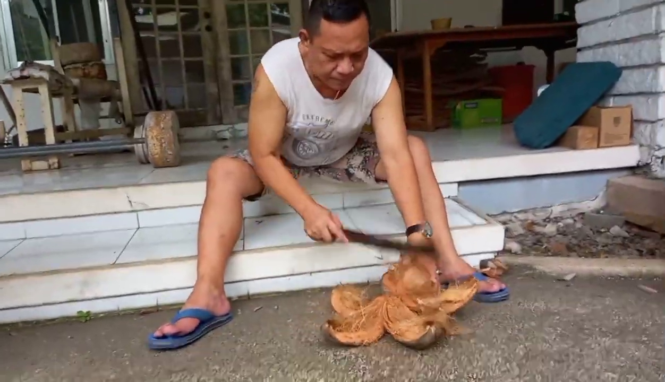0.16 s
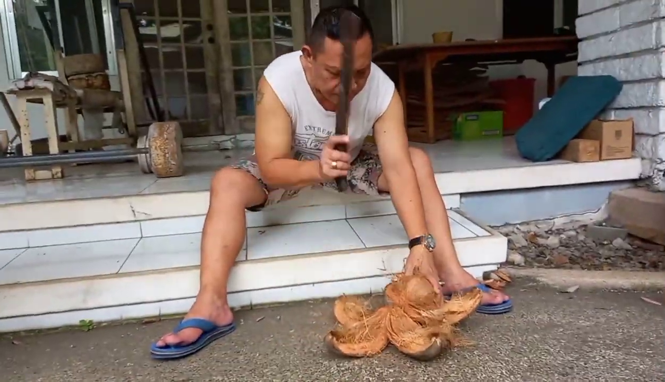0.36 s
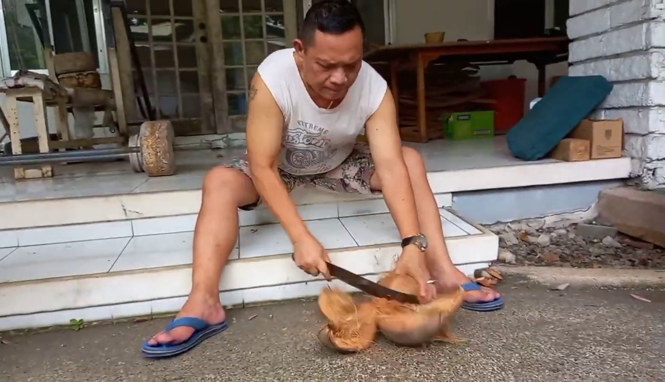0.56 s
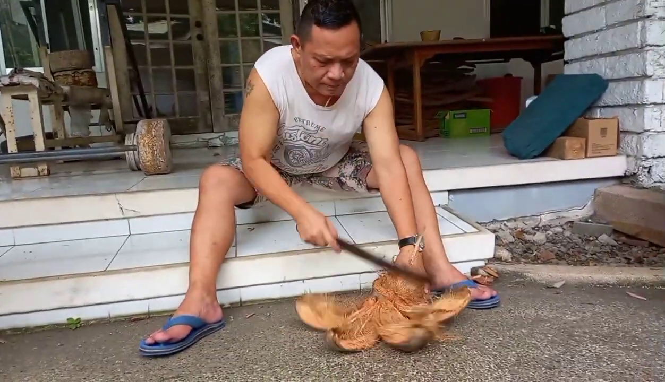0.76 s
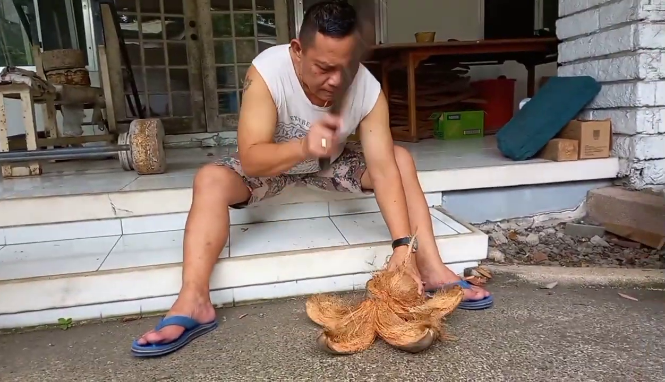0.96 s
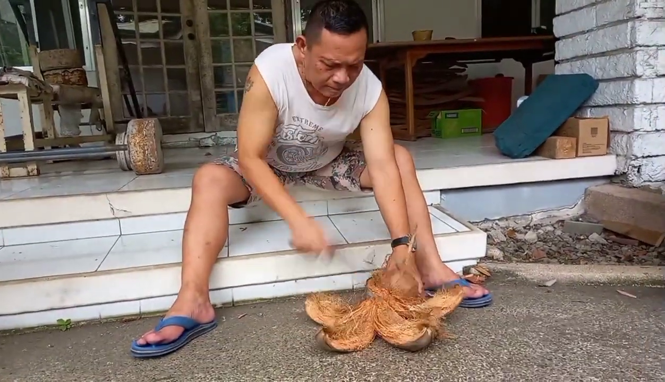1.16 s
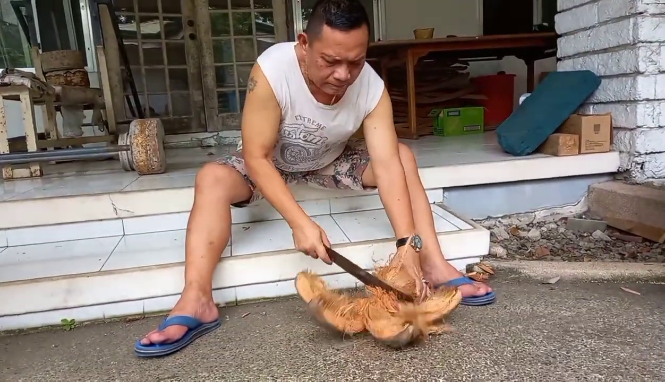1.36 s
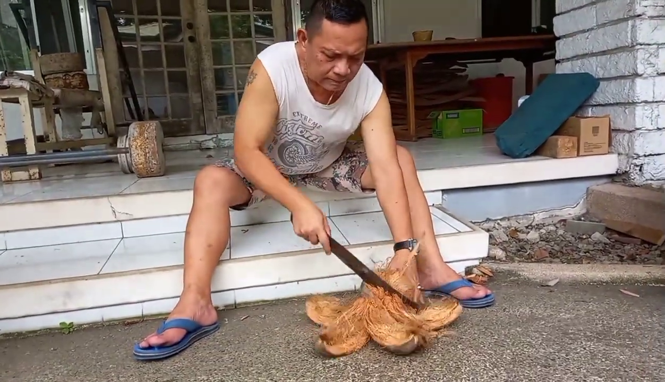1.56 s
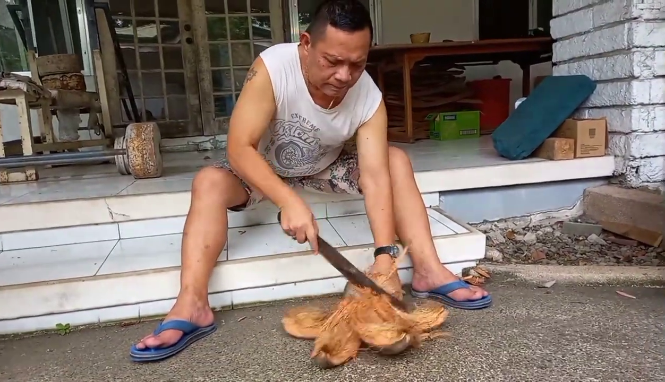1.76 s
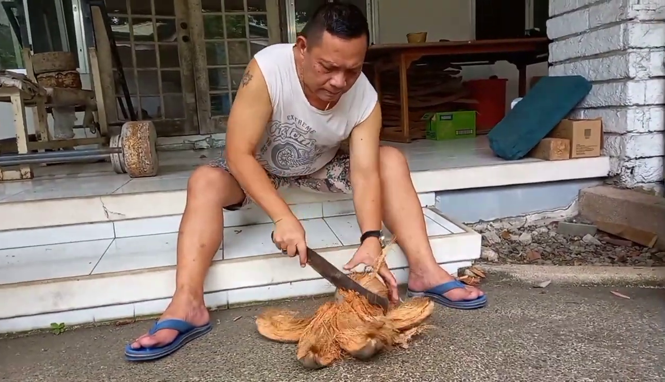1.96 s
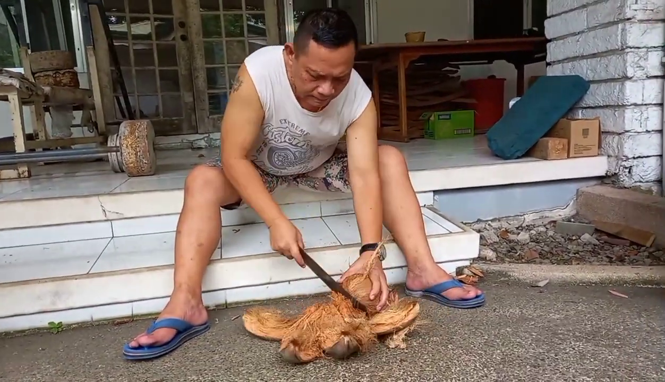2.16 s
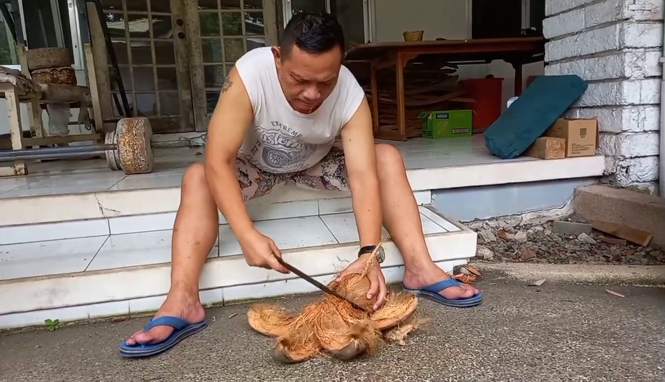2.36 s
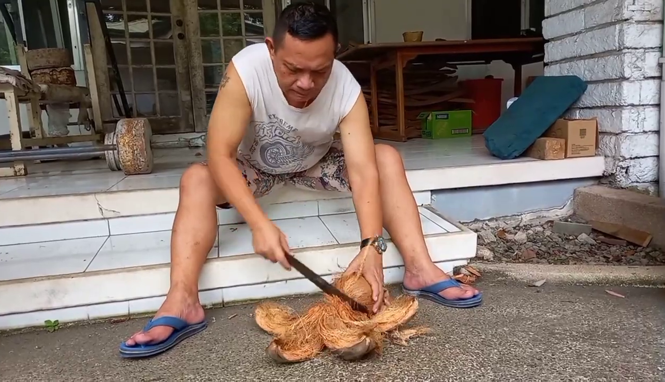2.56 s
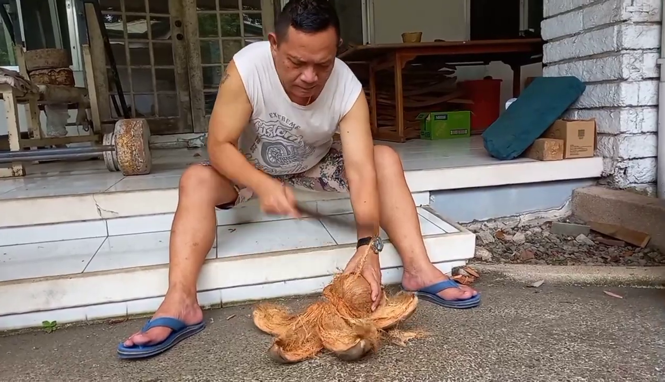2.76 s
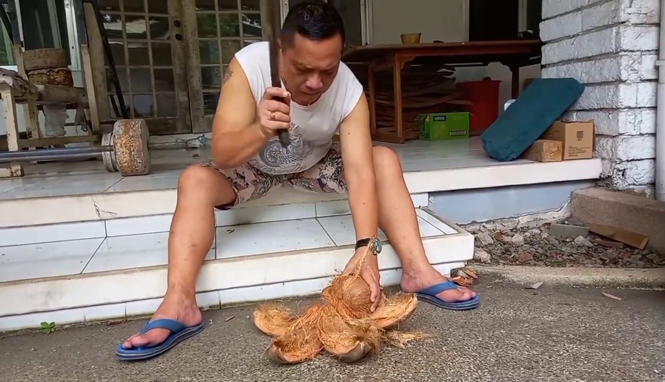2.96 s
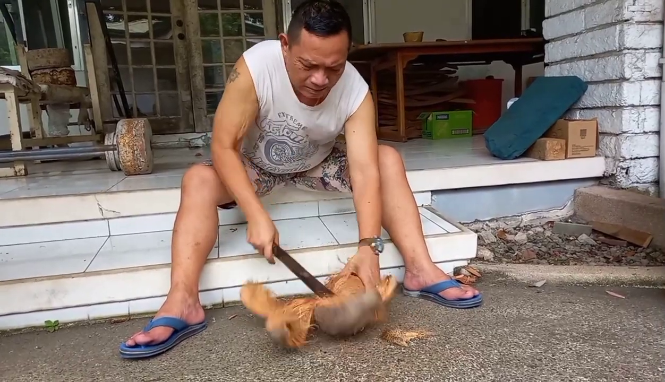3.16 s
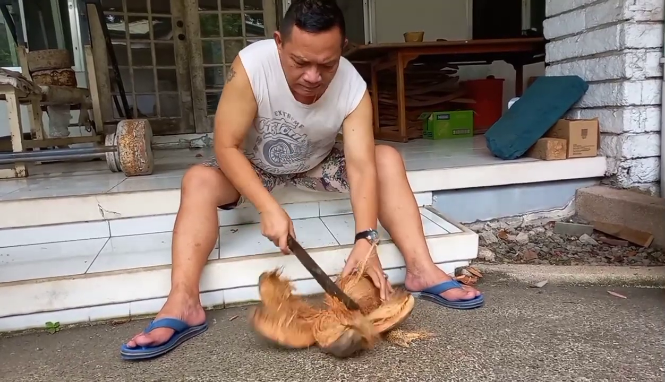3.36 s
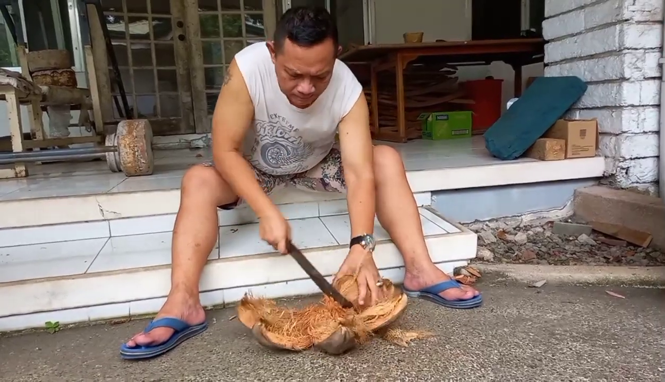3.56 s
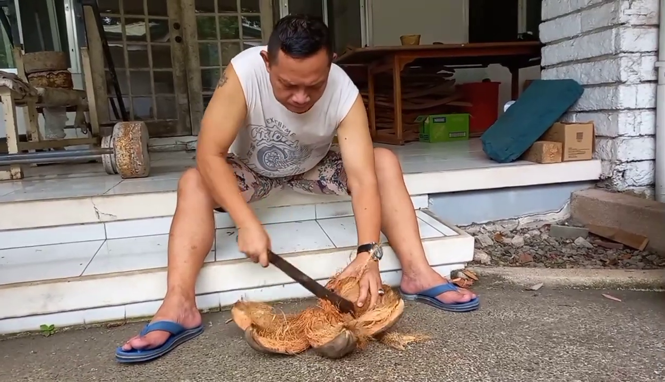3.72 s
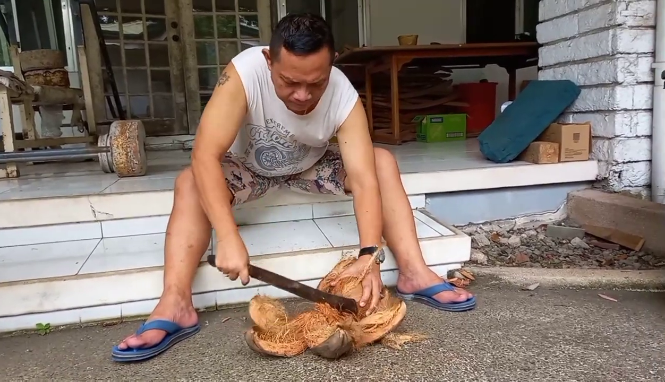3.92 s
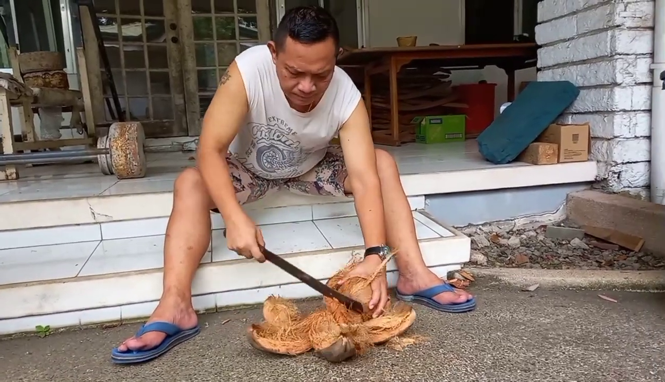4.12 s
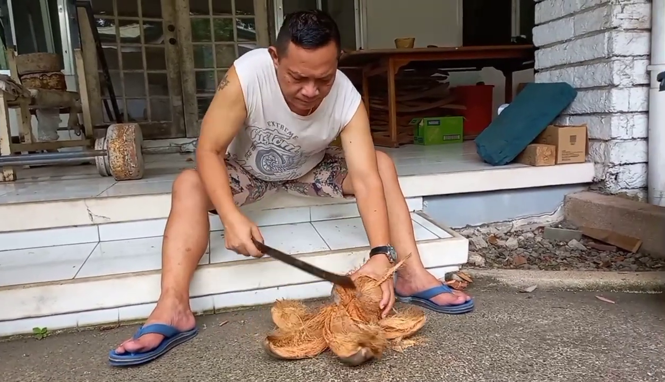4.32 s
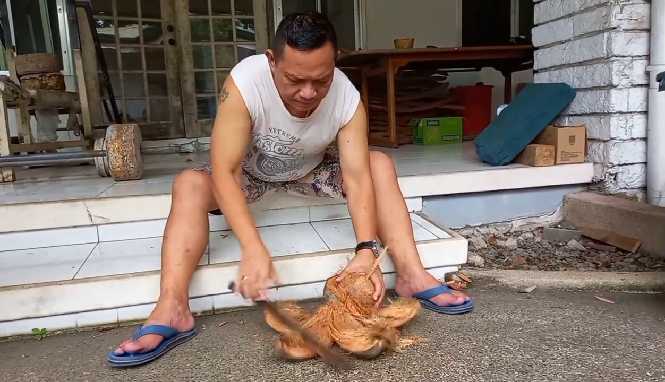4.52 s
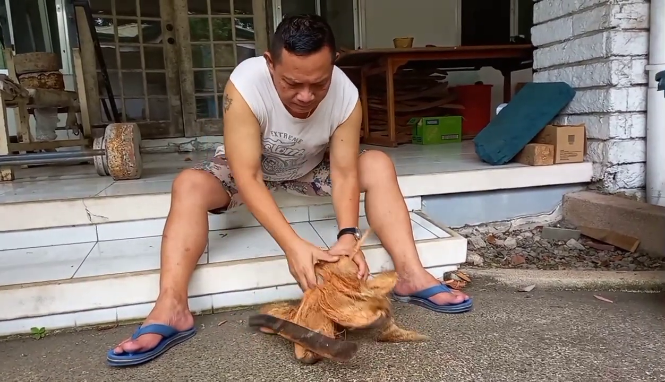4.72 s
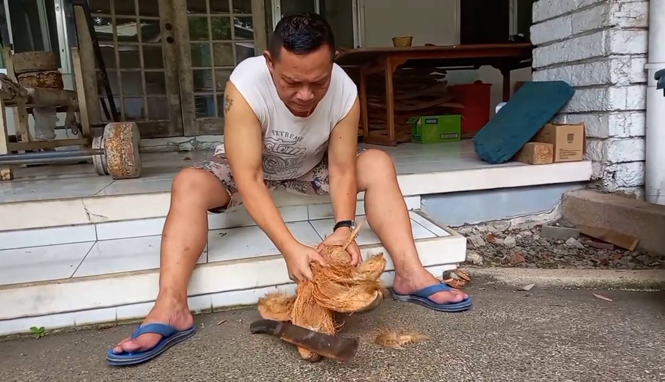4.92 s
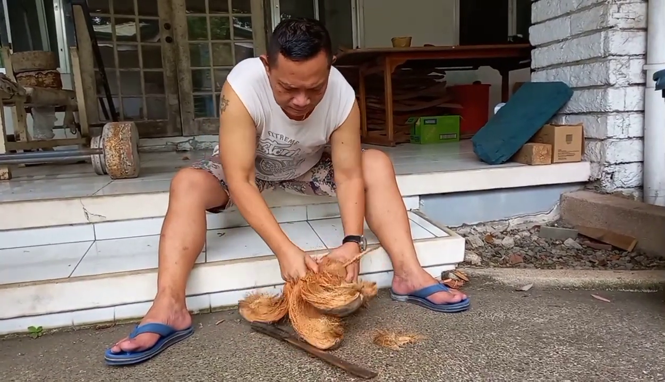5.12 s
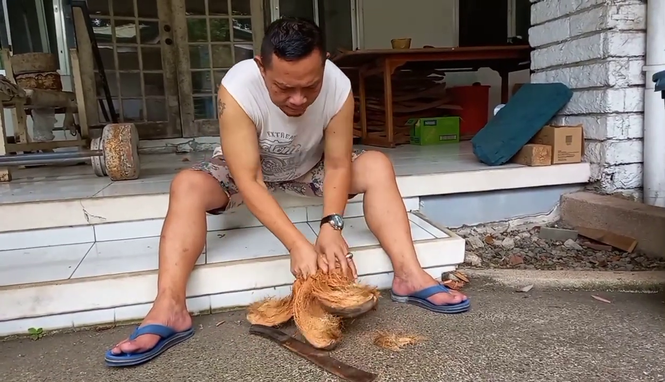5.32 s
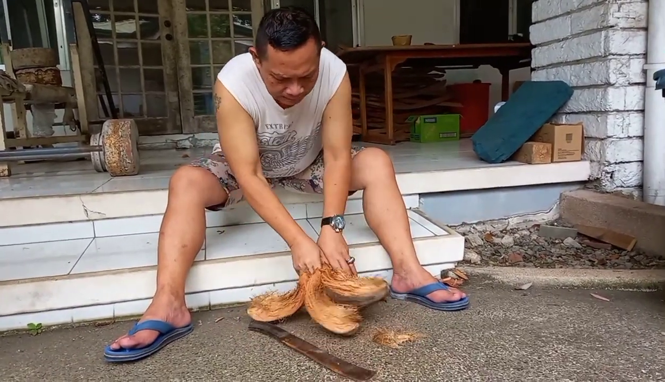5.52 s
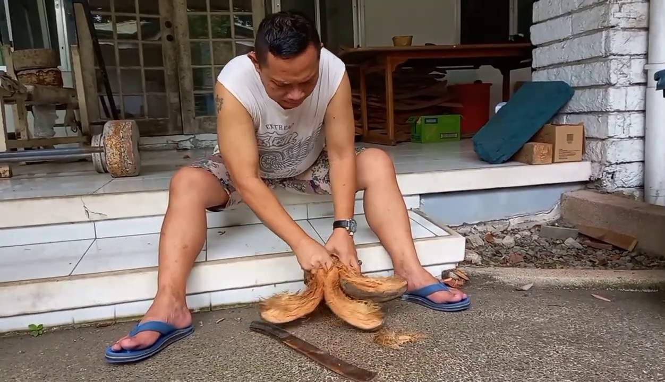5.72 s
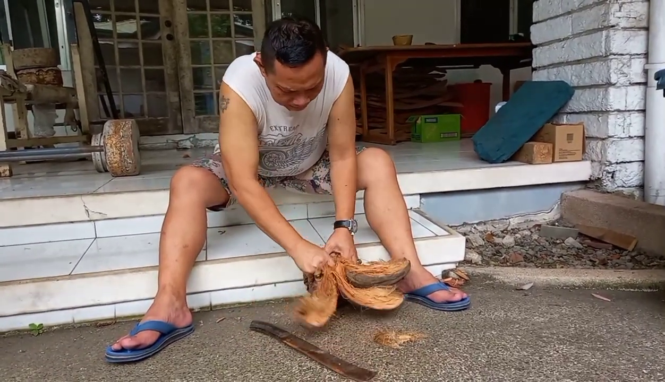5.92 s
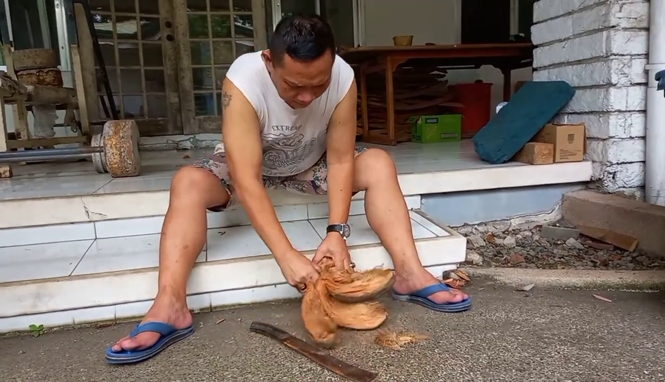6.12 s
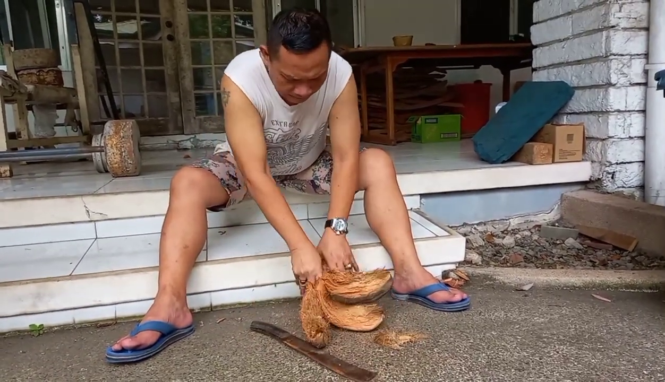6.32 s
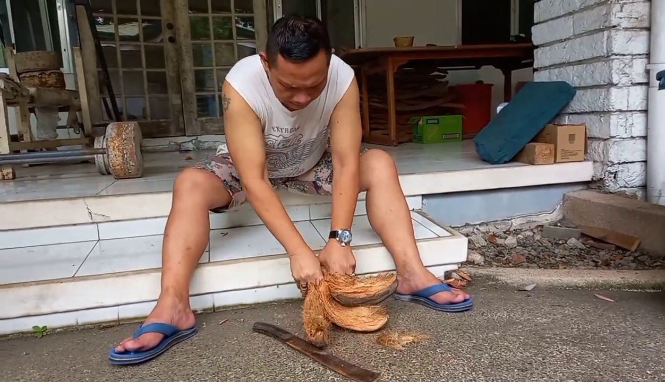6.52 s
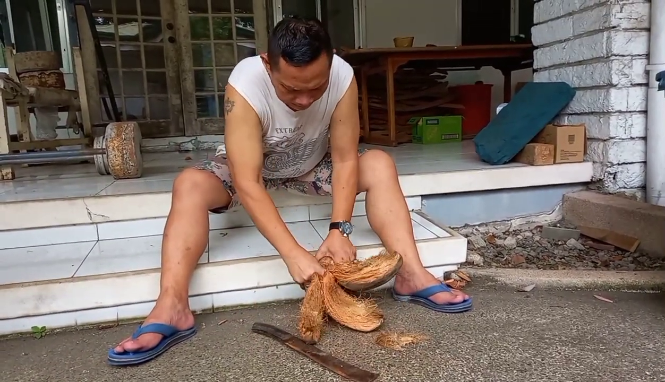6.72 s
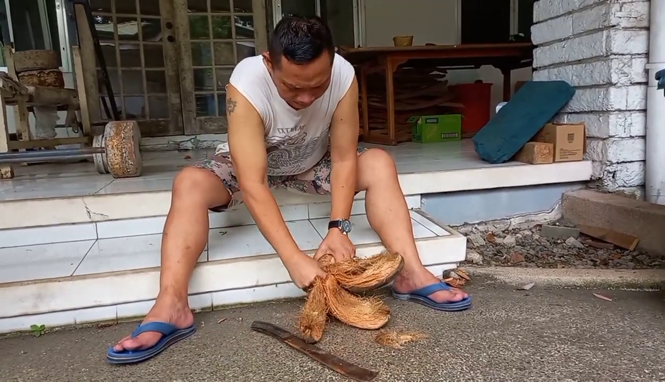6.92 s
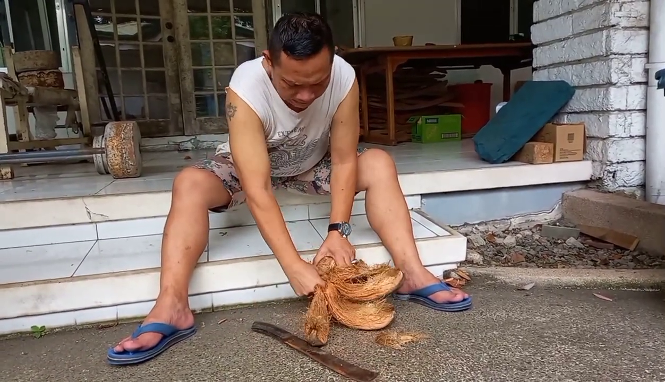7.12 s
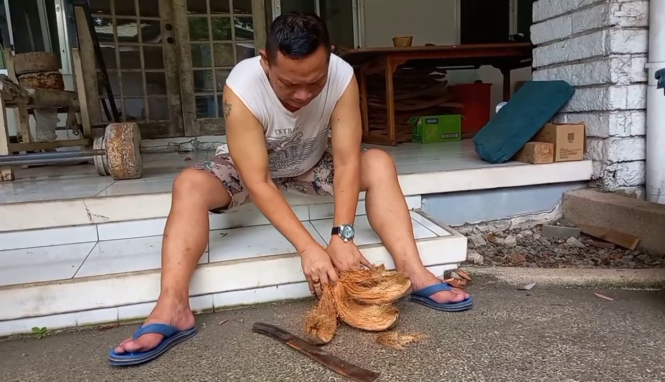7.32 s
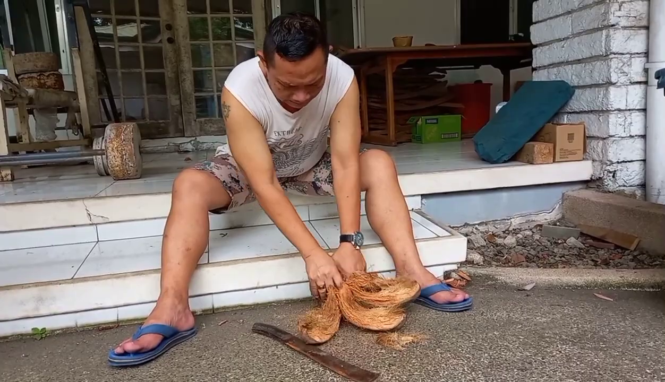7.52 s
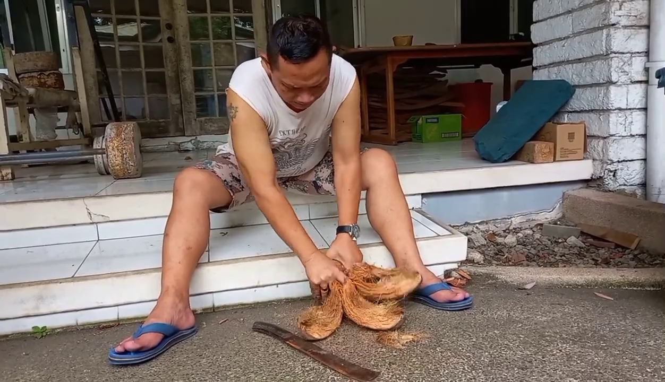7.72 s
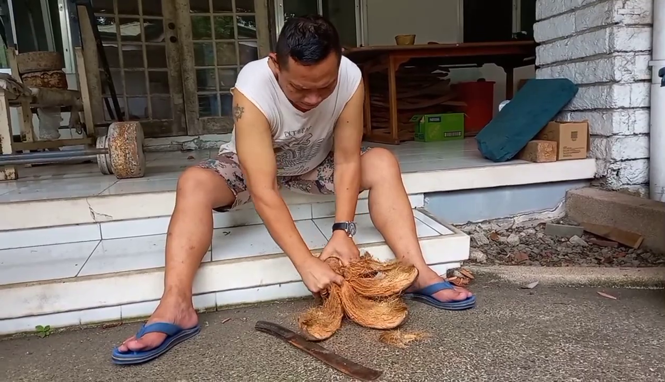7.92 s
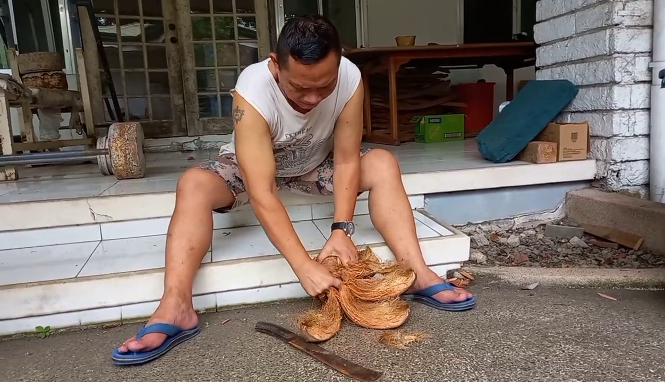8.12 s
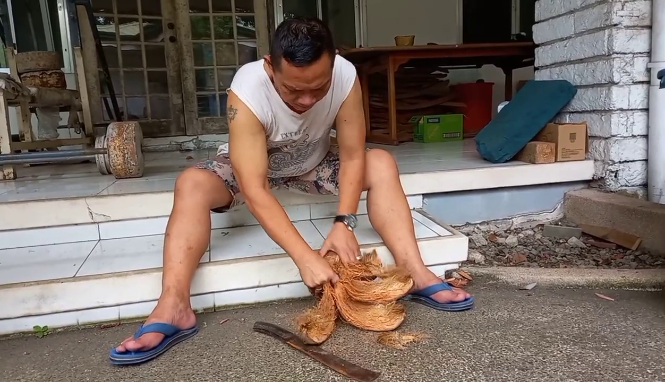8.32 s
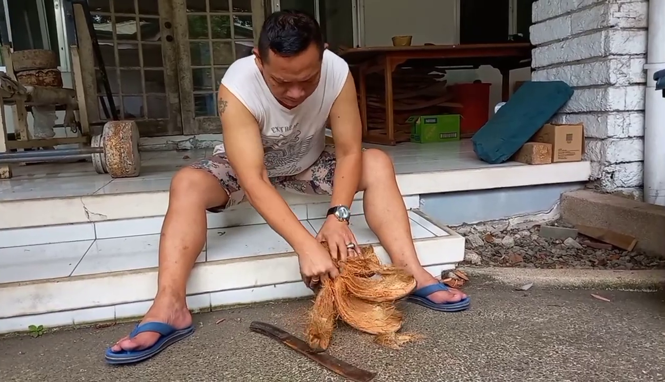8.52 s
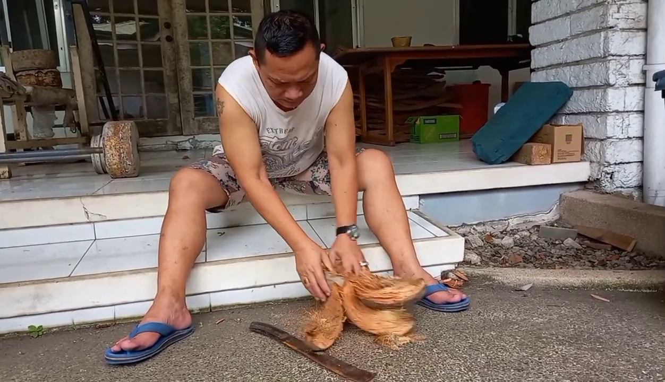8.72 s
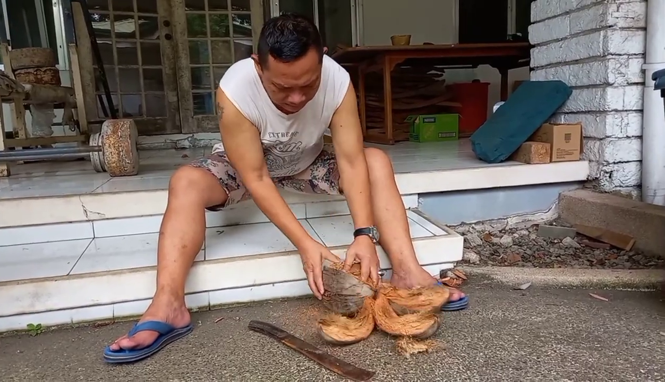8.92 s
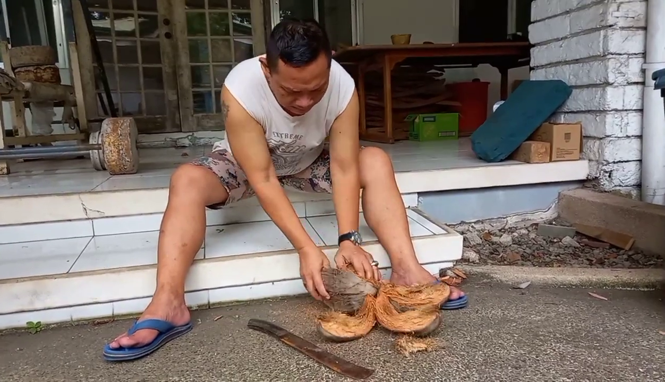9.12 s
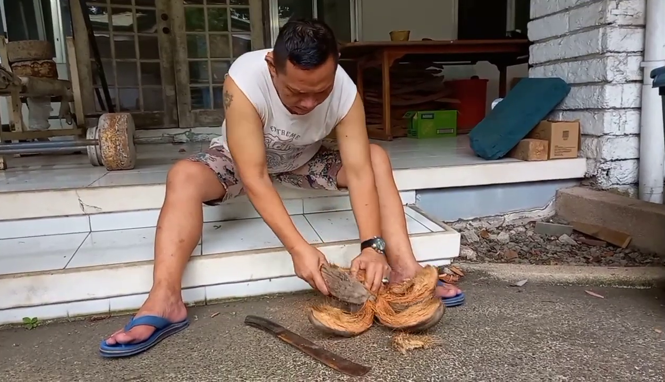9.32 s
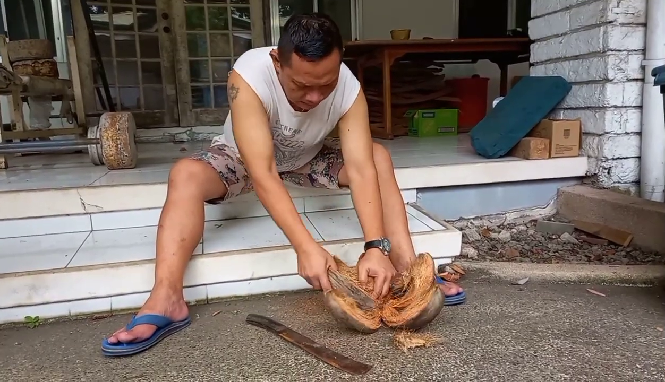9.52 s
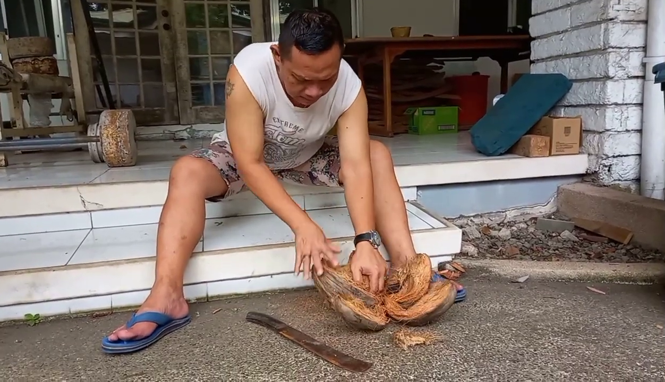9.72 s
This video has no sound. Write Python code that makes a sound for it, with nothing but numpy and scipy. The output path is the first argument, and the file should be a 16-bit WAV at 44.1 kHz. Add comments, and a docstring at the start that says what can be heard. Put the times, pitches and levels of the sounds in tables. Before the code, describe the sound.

Outdoors by a porch, close to the microphones, a blade chops into a dry coconut husk at about 0.5, 1.2 and 3.1 seconds. Each blow is a bright crack with a hollow knock, thrown back by hard surfaces in a short echo. Between and after the blows, fibres rustle and scrape as they are pried, and the nut knocks lightly on concrete. At 5 seconds the blade is dropped and bounces a few times with a brief, high steel ring. From about 5.5 seconds hands tear the husk apart in repeated pulls: dry strands fizz, crackle and snap, growing stronger from around 7.7 seconds, with several hollow knocks between 8.3 and 8.9. The sharpest snap comes as a quick double crack at 9.3 seconds, followed by a little more tearing. A low, wavering hum of distant machinery and faint open air continue underneath throughout.

```python
"""Outdoors by a porch, a spaced microphone pair near a dry coconut husk on concrete; a low hum throughout.
At 0.5, 1.2 and 3.1 s a blade chops in, each blow a bright crack and a hollow knock of the husk, with
fibres rustling in between. At 5 s the blade is dropped and bounces, its steel ringing. Hands then tear
the fibres off: strands fizz and snap, sharpest at 9.3 s, and the nut knocks on the ground.
The steps and the wall throw each blow back, and the porch echo follows."""
import sys
import numpy as np
from scipy import signal
from scipy.fft import rfft, irfft
from scipy.io import wavfile
from scipy.ndimage import uniform_filter1d

SR = 44100
rng = np.random.default_rng(int(sys.argv[2]) if len(sys.argv) > 2 else 0)


def generate_wav(sig):
    """Save sig (samples, or channels by samples) to the path in sys.argv[1] as 16-bit PCM at SR."""
    pcm = np.round(np.clip(np.atleast_2d(sig).T, -1, 1) * 32767).astype(np.int16)
    wavfile.write(sys.argv[1], SR, pcm)


N = 435266


# Blade into the husk: t/s, crack level/dB, crack f/Hz, knock level/dB, knock f/Hz, thud level/dB, echo/dB
CHOPS = [(0.5464, -27, 4500, -25.5, 583, -33.5, 0), (1.181, -23, 3330, -24, 764, -36, 2),
         (3.1216, -24.5, 2400, -26.5, 768, -29.5, 2)]
def chops():
    """Near the microphones, the blade bites into the husk and drives the nut against the concrete."""
    return sum(blow(*row, t60=.041) for row in CHOPS)


def blow(s, crack_db, crack_hz, knock_db, knock_hz, thud_db, echo_db, t60):
    """Breaking fibres crack, knock the husk and thud into the ground. Returns (direct, sent to porch)."""
    t, noise = np.arange(6000) / SR, rng.standard_normal((3, 6000))
    burst = (1 - np.exp(-t / (.035 * t60))) * amp(-60 * t / t60)
    breaking = burst * (noise[0] + .6 * noise[1:])
    bright = breaking - signal.lfilter([.2], [1, -.8], breaking)
    crack = unit(.4 * bright + ring(bright, crack_hz, .6 * crack_hz))
    contact = unit(t * np.exp(-t / .0001))  # first touch, then the fibres crush
    push = .25 * contact + unit(burst * (noise[0] + .19 * noise[1:]))
    hit = amp(crack_db) * crack + amp(knock_db) * husk_knock(push, knock_hz)
    hit += amp(thud_db) * ground_thud(push + 1.5 * contact)
    direct = place(hit, s - .001)  # the rise is under way at s
    return np.array([direct, amp(echo_db) * direct])


# Shell modes: f/Hz, width/Hz, level/dB
HUSK_MODES = [(332.8, 130, 2), (492.6, 150, 4), (732, 92, -2), (983, 190, 6), (1387, 290, -4.5),
              (1717, 350, 1.5), (2410, 440, -5)]
def husk_knock(push, centre_hz):
    """The hollow shell answers a push, its modes 7 dB weaker per octave away from centre_hz."""
    return body(push, [(hz, width, db - 7 * abs(np.log2(hz / centre_hz))) for hz, width, db in HUSK_MODES])


# Nut on concrete: f/Hz, width/Hz, level/dB
GROUND_MODES = [(85, 40, -6), (129, 67, 0.5), (229, 79, 3), (287, 140, -0.5)]
def ground_thud(push):
    """The whole nut rocks on the ground with a low thud."""
    return body(push, GROUND_MODES)


# Blade landings: t/s, crack level/dB, crack f/Hz, knock level/dB, knock f/Hz, echo/dB
LANDINGS = [(5.0198, -29.5, 6760, -29.5, 2100, -3), (5.053, -25, 3970, -35, 490, -0.5),
            (5.0595, -28, 11500, -50.5, 2000, -9.5), (5.1454, -26, 7100, -35.5, 550, -5),
            (5.242, -43, 5640, -47.5, 570, -9.5)]
def dropped_blade():
    """The blade lands and bounces, shaking the nut each time."""
    return sum(blow(s, crack_db, crack_hz, knock_db, knock_hz, knock_db - 12, echo_db, t60=.032)
               for s, crack_db, crack_hz, knock_db, knock_hz, echo_db in LANDINGS)


# Steel modes: f/Hz, width/Hz, level/dB
STEEL_MODES = [(7900, 40, -3), (9150, 18, 0), (9700, 30, -6), (11900, 15, -1), (12720, 15, -2),
               (13760, 15, -1), (15200, 20, -4)]
def steel_ring():
    """Each landing sets the steel singing, softer than its crack."""
    out, t = np.zeros((2, N)), np.arange(SR // 2) / SR
    for s, crack_db, *_ in LANDINGS:
        for hz, width, db in STEEL_MODES:
            mode = np.sin(2 * np.pi * (hz * t + rng.random((2, 1)))) * np.exp(-np.pi * width * t)
            out += place(amp(crack_db - 8 + db) * mode, s)
    return out


# Prying and tearing: peak t/s, rise/s, fall/s, fizz level/dB, scrape over fizz/dB, thump over fizz/dB
PULLS = [(0.014, 0.018, 0.14, -50.5, -28, 2), (1.5, .2, 0.24, -43, -4.5, 4.5),
         (1.83, .04, 0.062, -66.5, 1, 20.5), (1.854, 0.083, 0.048, -48.5, -3, 4),
         (2.06, 0.069, 0.65, -53, -13.5, -21), (2.296, 0.044, 0.13, -43.5, -4, -25),
         (2.635, 0.21, 0.19, -48.5, -17.5, -18.5), (3.501, 0.57, 0.16, -58, -13, -10),
         (3.79, 0.13, 0.14, -47, -6.5, -30), (4.206, 0.23, .23, -50.5, -19, -21),
         (4.589, 0.11, 0.037, -50, 4.5, -2), (4.748, 0.12, 0.091, -48, -25, 13.5),
         (4.98, 0.069, 0.038, -40.5, -1.5, -30), (5.43, 0.084, 0.32, -49, -2, -12),
         (5.549, 0.13, 0.05, -83, -28, 49.5), (5.82, 0.042, 0.33, -45, -4.5, -25),
         (6.005, 0.29, 0.037, -39.5, 0.5, -13), (6.2, .09, 0.19, -53.5, -10, -27),
         (6.58, 0.07, 0.064, -58, 2, 0), (6.65, 0.069, 0.32, -46.5, 0.2, -20),
         (6.875, 0.039, 0.27, -39.5, -1.5, -23), (7.0, 0.18, 0.069, -46.5, -1.5, -21),
         (7.24, 0.068, 0.26, -52.5, -1.5, -2), (7.4, 0.046, 0.42, -53.5, -12, -16.5),
         (7.74, .1, 0.15, -37, -1.5, -10.5), (7.89, .04, 0.2, -42, 0, -29),
         (8.02, 0.39, 0.088, -41, -3.5, -30), (8.302, 0.045, 0.1, -41, 7.5, 3),
         (8.65, 0.065, 0.32, -45, -20, 0), (8.808, .15, 0.081, -36, -3.5, 0),
         (8.9, .05, 0.99, -56.5, -22, -13), (9.2, 0.11, 0.15, -49.5, -1, -0.5),
         (9.28, 0.16, 0.13, -44, 1, -13), (9.435, 0.22, 0.41, -52, -7, 0.5),
         (9.87, 0.16, .1, -41.5, -8.5, -8.5)]
def strokes():
    """Gains of fizz, scrape and thump: each pull swells and fades, and overlapping pulls add as powers."""
    t, power = np.arange(N) / SR, np.zeros((3, N))
    for s, rise, fall, fizz_db, scrape_db, thump_db in PULLS:
        from_peak = np.maximum((s - t) / rise, (t - s) / fall)
        power += (amp(fizz_db - 20 * from_peak) * amp([[0], [scrape_db], [thump_db]])) ** 2
    return np.sqrt(power)


# Spectra of fine and of coarse strands: f/Hz, level/dB
FIZZ_SPECTRUM = [(880, -48.5), (1500, -27), (1710, 1.5), (2000, -18), (2270, -20), (3810, 8), (6560, 3.5),
                 (14800, -1), (16000, -17.5)]
SCRAPE_SPECTRUM = [(410, -45), (700, -15), (845, -12), (996, -1), (1540, -6), (3000, -6), (3900, -36),
                   (6600, -120)]
def tearing_fibres():
    """Under each pull fine strands fizz, coarse ones scrape and the husk thumps on the ground."""
    fine = grains(per_s=220, spread_db=3.5, decay_s=.0012, hiss=.45)
    coarse = grains(per_s=110, spread_db=4, decay_s=.002, hiss=.4)
    jolts = grains(per_s=60, spread_db=3.5, decay_s=.006, hiss=.6)
    fizz = colour(fine, FIZZ_SPECTRUM)
    scrape = colour(.52 * fine + coarse, SCRAPE_SPECTRUM)
    jolts = .36 * jolts.mean(0) + .58 * jolts  # narrower between the microphones
    thump = sum(amp(db) * ring(jolts, hz, width) for hz, width, db in GROUND_MODES[2:] + HUSK_MODES[:3])
    return sum(gain * unit(layer) for gain, layer in zip(strokes(), (fizz, scrape, thump)))


def grains(per_s, spread_db, decay_s, hiss):
    """Tiny uneven snaps, each a puff of noise, clumping around a base rate over a rubbing hiss."""
    chance = per_s / SR * amp(6 * wander(29))
    size = amp(spread_db * np.minimum(rng.exponential(1, N), 5)) * (rng.random(N) < chance)
    puffs = signal.lfilter([1], [1, -np.exp(-1 / (decay_s * SR))], size)
    return unit((unit(puffs) + hiss) * pair_noise(apart=1.6))  # the fibres lie spread out


# Strands breaking: t/s, crack level/dB, crack f/Hz, knock level/dB
SNAPS = [(0.0129, -54.5, 5066, -54.5), (1.4303, -40, 12900, -48), (1.7968, -61.5, 4070, -56.5),
         (1.819, -77, 2680, -59), (2.2908, -61, 14200, -60.5), (2.848, -69, 4500, -72),
         (2.949, -72.5, 4200, -69.5), (3.7889, -60, 4840, -64), (4.2082, -53.5, 13640, -85),
         (4.9654, -48, 4650, -59), (5.7894, -59, 3700, -82.5), (6.6315, -55, 7100, -57),
         (6.757, -54.5, 4440, -67), (6.8634, -49, 9000, -61), (6.9114, -44.5, 2640, -60),
         (7.0068, -51.5, 3320, -67), (7.107, -60, 4130, -80), (7.2398, -51.5, 6850, -49),
         (7.408, -53.5, 7040, -64.5), (7.464, -56, 4000, -60), (7.6492, -59, 4900, -61),
         (7.717, -49, 3680, -64), (7.878, -54, 13700, -62), (8.959, -66, 4000, -62),
         (9.0009, -56, 12000, -63), (9.021, -63, 5870, -64.5), (9.1445, -55.5, 3800, -60.5),
         (9.301, -30.5, 6700, -65), (9.3195, -29.5, 7030, -48.5), (9.4382, -45, 8700, -53),
         (9.674, -62.5, 6900, -68.5)]
def strand_snaps():
    """Single strands give way and shake the nut."""
    return sum(blow(s, crack_db, crack_hz, knock_db, knock_hz=1130, thud_db=knock_db - 12,
                    echo_db=-6.5, t60=.033) for s, crack_db, crack_hz, knock_db in SNAPS)


# Nut against the ground: t/s, crack level/dB, knock level/dB, knock f/Hz, thud level/dB
KNOCKS = [(0.7126, -47, -40.5, 440, -43), (0.741, -51, -47, 400, -45), (0.79, -59, -53, 446, -55),
          (1.3705, -40.5, -31, 483, -45.5), (1.4297, -45.5, -45, 425, -44), (3.369, -39, -32, 430, -41.5),
          (3.387, -51, -39, 470, -46), (4.5149, -54, -45.5, 490, -50), (4.5742, -61, -39, 540, -51),
          (4.591, -66, -49, 415, -33), (4.6644, -61.5, -47, 463, -63), (4.7314, -62, -40, 470, -42),
          (5.046, -49, -37.5, 476, -34.5), (5.131, -58, -39.5, 790, -45.5),
          (5.4864, -54.5, -46, 436, -63.5), (5.5116, -59, -48, 480, -70), (5.5579, -56, -39.5, 478, -52),
          (6.0092, -48.5, -44, 437, -63), (6.0505, -57, -46.5, 595, -49.5), (6.074, -75, -48.5, 330, -57),
          (6.236, -79, -56.5, 350, -61), (6.26, -81, -58, 346, -58.5), (6.29, -74.5, -65, 350, -61),
          (8.2949, -48, -58, 570, -68), (8.305, -67, -37.5, 1150, -56.5), (8.6514, -45.5, -33, 930, -44.5),
          (8.7664, -51, -49, 1330, -60), (8.7891, -48, -40, 1040, -54.5), (8.8416, -48, -41.5, 420, -48.5),
          (9.2441, -46.5, -42, 1080, -64.5)]
def nut_knocks(crack_hz=3200):
    """The nut and its flaps knock on the concrete."""
    return sum(blow(s, crack_db, crack_hz, knock_db, knock_hz, thud_db, echo_db=-6, t60=.036)
               for s, crack_db, knock_db, knock_hz, thud_db in KNOCKS)


# Reflections off the steps and the wall: delay/s, level/dB
WALLS = [(.013, -8.5), (.031, -15)]
def wall_slaps(x):
    """Hard surfaces a few metres off return single echoes, duller than the blow."""
    late = sum(amp(db) * np.roll(x, round(s * SR), axis=1) for s, db in WALLS)
    return shape(late, lambda hz: 1 / (1 + hz / 9000))


# Porch decay: f/Hz, t60/s
PORCH_DECAY = [(100, 0.89), (300, 0.48), (1000, 0.56), (3000, 0.63), (8000, 0.67), (16000, 0.36)]
def porch_echo(x):
    """Diffuse echo: the power in each band lingers and dies at its own speed, with random phases."""
    hz, t, spectra = signal.stft(x, SR, nperseg=512, noverlap=384)
    power = uniform_filter1d((abs(spectra) ** 2).mean(0), size=5, axis=0)  # the echo blurs fine colour
    keep = amp(-120 * t[1] / curve(PORCH_DECAY, hz))  # share of power left after one frame
    held = np.array([signal.lfilter([0, 0, 0, 1 - k], [1, -k], p) for k, p in zip(keep, power)])
    noise = rng.standard_normal((3, *held.shape)) + 1j * rng.standard_normal((3, *held.shape))
    alike = 1 / (1 + (hz[:, None] / 900) ** 2)  # both microphones hear much the same bass
    field = np.sqrt(2 * held) * (np.sqrt(alike) * noise[0] + np.sqrt(1 - alike) * noise[1:])
    return signal.istft(field, SR, nperseg=512, noverlap=384)[1][:, :N]


# Machinery: t/s, tone level/dB, rumble level/dB
MACHINERY = [(0.0, -47.5, -41.5), (0.38, -47, -62), (0.58, -55.5, -57), (1.43, -47.5, -54.5),
             (1.98, -56.5, -62), (3.16, -48, -51.5), (3.24, -42, -49.5), (3.85, -65, -63),
             (4.37, -72, -62.5), (4.75, -42, -54), (5.28, -49.5, -55.5), (6.6, -52.5, -55),
             (6.82, -45.5, -53.5), (8.55, -43.5, -51), (9.65, -51, -53.5), (9.87, -49.5, -46.5)]
def machinery_hum(tone_hz=44.5):
    """Far machinery: a wavering low tone over a lumpy rumble."""
    t, (s, tone_db, rumble_db) = np.arange(N) / SR, np.transpose(MACHINERY)
    turns = np.cumsum(tone_hz * (1 + .025 * wander(.89))) / SR
    tone = np.sqrt(2) * np.sin(2 * np.pi * turns) * amp(np.interp(t, s, tone_db) + wander(6))
    rumble = shape(pair_noise(apart=.63), lambda hz: 1 / (1 + (58 / (hz + 1)) ** 10) / (1 + (hz / 140) ** 3))
    return tone + amp(np.interp(t, s, rumble_db)) * unit(rumble)


# Open air: f/Hz, level/dB
AIR_SPECTRUM = [(32, -49), (55, 3), (136, -3.5), (189, -30), (319, -15), (444, -27.5), (488, -52.5),
                (700, -70), (16000, -110)]
def outdoor_air():
    """Low, steady air all around, more alike at the two microphones the deeper it is."""
    noise = colour(rng.standard_normal((3, N)), AIR_SPECTRUM)
    common = shape(noise[0], lambda hz: 1 / (1 + hz / 900))
    separate = shape(noise[1:], lambda hz: 1 / (1 + 600 / (hz + 1)))
    return amp(-52) * unit(common + separate)


# Buzz overtones: f/Hz, level/dB
BUZZ_LINES = [(242.2, -77.5), (301.5, -86), (360.7, -89.5), (419.9, -71.5)]
def electric_buzz():
    """Thin, steady electric tones, centred between the microphones."""
    t = np.arange(N) / SR
    return sum(np.sqrt(2) * amp(db) * np.sin(2 * np.pi * (hz * t + rng.random())) for hz, db in BUZZ_LINES)


# Far side of the yard: f/Hz, level/dB
YARD_SPECTRUM = [(310, -31), (520, -1), (833, -11), (989, 1), (1210, -15), (2300, -13), (2580, -21),
                 (4010, -11), (5190, -19), (6150, -14), (15800, -26)]
def distant_yard():
    """A faint outdoor wash from far off, higher than the hum."""
    return amp(-75) * unit(colour(pair_noise(apart=1), YARD_SPECTRUM))


def amp(db):
    return 10 ** (np.asarray(db) / 20)


def unit(x):
    return x / np.sqrt(np.mean(x ** 2) + 1e-20)


def curve(points, hz):
    """Interpolates (f/Hz, value) points over log frequency."""
    f, value = np.transpose(points)
    return np.interp(np.log(hz + 1), np.log(f + 1), value)


def shape(x, gain):
    """Filters x by gain(f/Hz)."""
    return irfft(rfft(x) * gain(np.fft.rfftfreq(x.shape[-1], 1 / SR)), x.shape[-1])


def colour(x, spectrum):
    return shape(x, lambda hz: amp(curve(spectrum, hz)))


def ring(x, hz, width):
    """A damped mode, width Hz wide."""
    r = np.exp(-np.pi * width / SR)
    return signal.lfilter([1 - r, 0, r - 1], [1, -2 * r * np.cos(2 * np.pi * hz / SR), r * r], x)


def body(push, modes):
    """Modes of alternating sign, each rung twice over for a soft start."""
    return unit(sum((-1) ** k * amp(db) * ring(ring(push, hz, width), hz, width)
                    for k, (hz, width, db) in enumerate(modes)))


def wander(rate_hz):
    """Slow random drift, rms 1."""
    return unit(shape(rng.standard_normal(N), lambda hz: 1 / (1 + (hz / rate_hz) ** 4)))


def pair_noise(apart):
    """Noise common to both microphones, plus some that each hears alone."""
    noise = rng.standard_normal((3, N))
    return noise[0] + apart * noise[1:]


def place(sound, s):
    return np.pad(sound, ((0, 0), (round(s * SR), N)))[:, :N]


def scene():
    """Husk and blade in front, the porch around them, hum and air behind."""
    hits, to_porch = chops() + dropped_blade() + nut_knocks() + strand_snaps()
    rustle, steel = tearing_fibres(), steel_ring()
    to_porch = shape(to_porch, lambda hz: 1 / np.sqrt(1 + (hz / 7000) ** 2))  # blows come back duller
    echoes = wall_slaps(hits) + porch_echo(to_porch + steel + amp(-5) * rustle)
    background = outdoor_air() + machinery_hum() + electric_buzz() + distant_yard()
    return hits + steel + rustle + echoes + background


# Microphone response: f/Hz, level/dB
MIC_RESPONSE = [(28, -32), (40, -2.5), (6000, -3), (11000, -0.5), (14500, 3.5)]
# Balance of the pair: f/Hz, left over right/dB
MIC_BALANCE = [(60, 0.5), (130, -1), (290, 1.5), (640, 0.5), (1410, -0.5), (3100, 2), (6820, 0.5),
               (15000, 3.5)]
def record(dry, right_lag_s=3e-5, top_hz=15900):
    """The spaced pair differs a little in colour and arrival; peaks are squeezed, the top treble is cut."""
    left, right = colour(dry, MIC_RESPONSE)
    left = shape(left, lambda hz: amp(curve(MIC_BALANCE, hz) / 2))
    right = shape(right, lambda hz: amp(-curve(MIC_BALANCE, hz) / 2) * np.exp(-2j * np.pi * hz * right_lag_s))
    squeezed = 1.171 * np.tanh(np.array([left, right]) / 1.229)
    lowpass = signal.firwin(255, top_hz, window=("kaiser", 12), fs=SR)
    return signal.oaconvolve(squeezed, lowpass[None], "same")


dry = scene()
out = record(dry)
generate_wav(out)
```